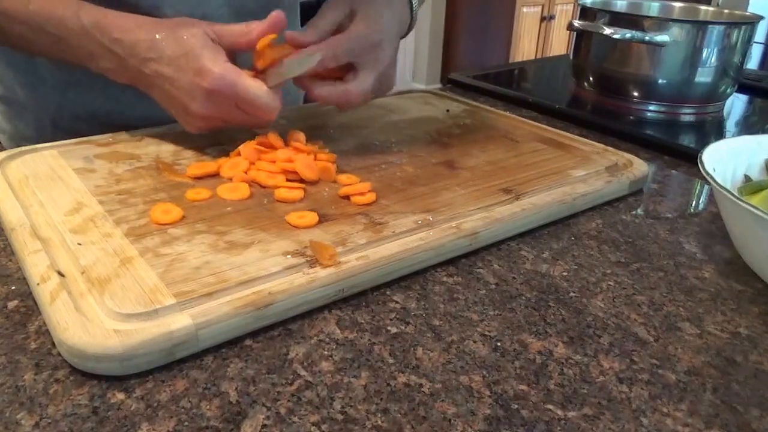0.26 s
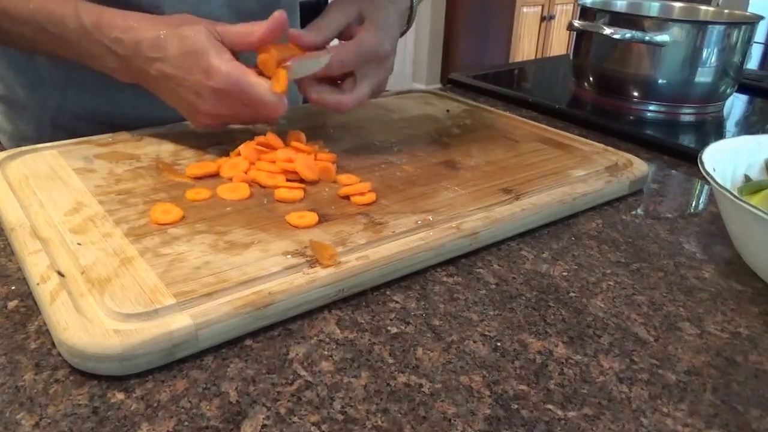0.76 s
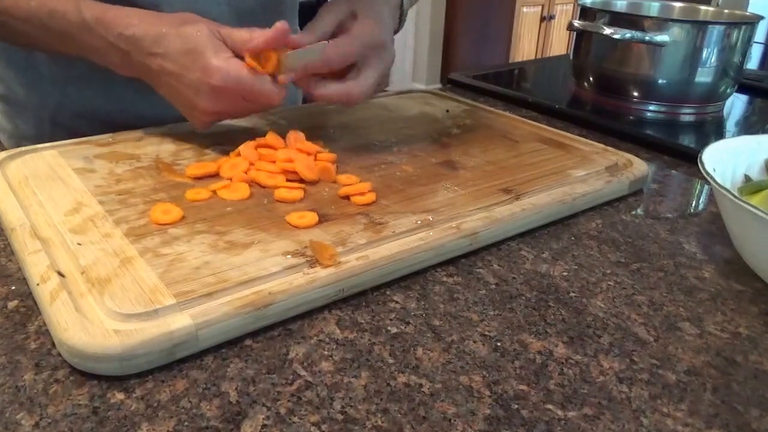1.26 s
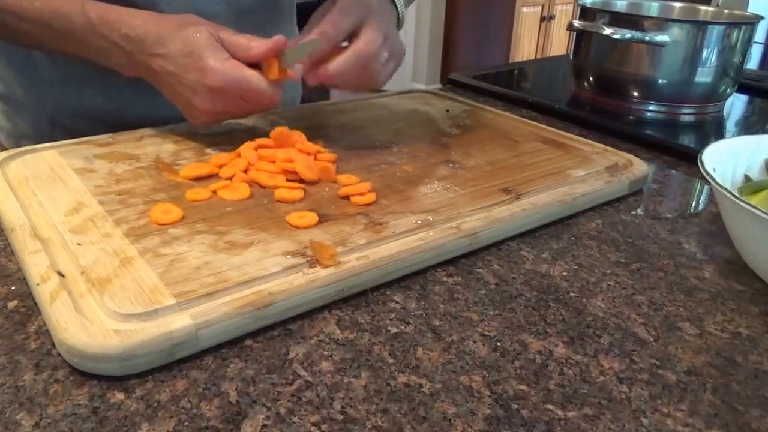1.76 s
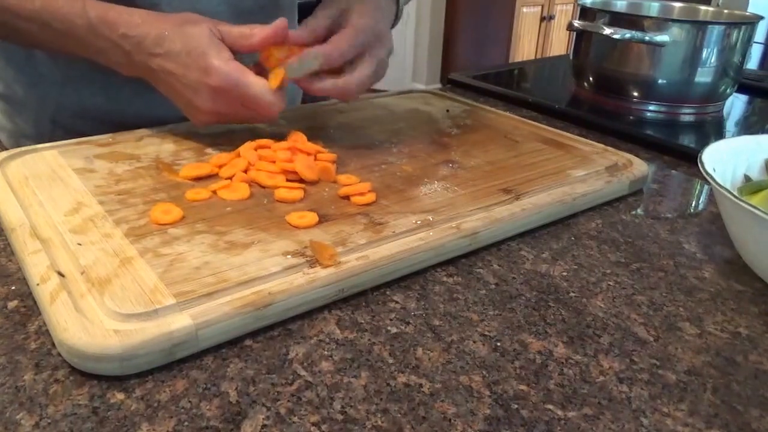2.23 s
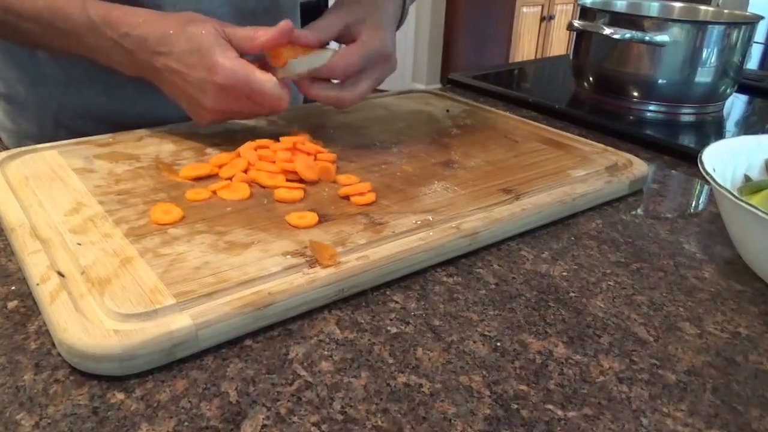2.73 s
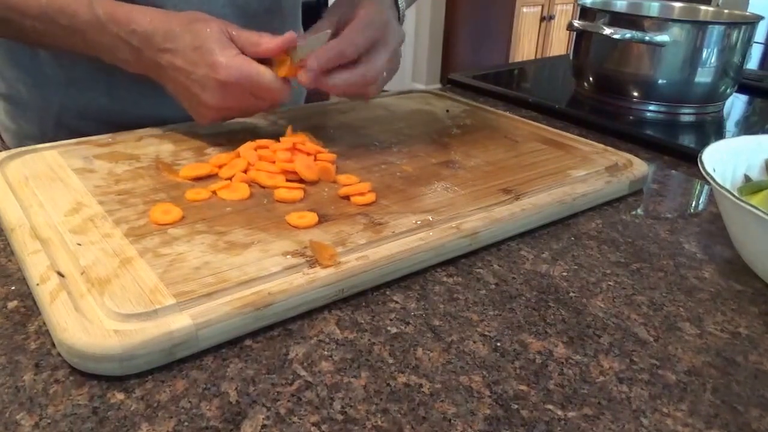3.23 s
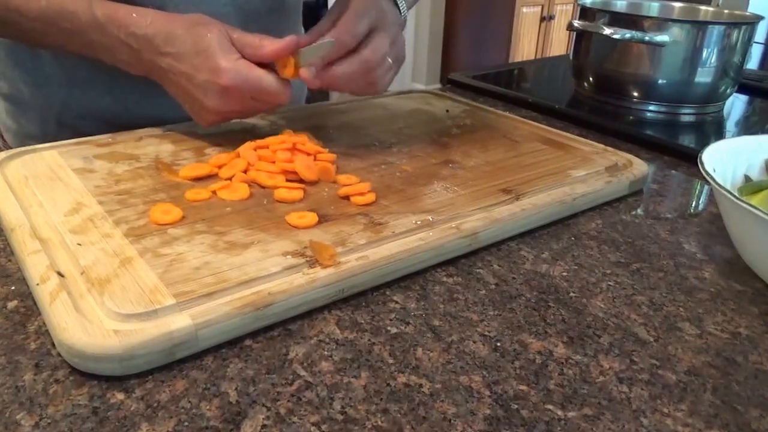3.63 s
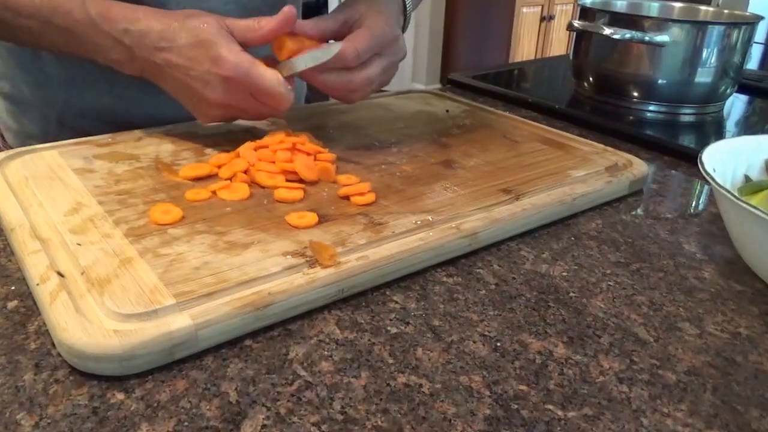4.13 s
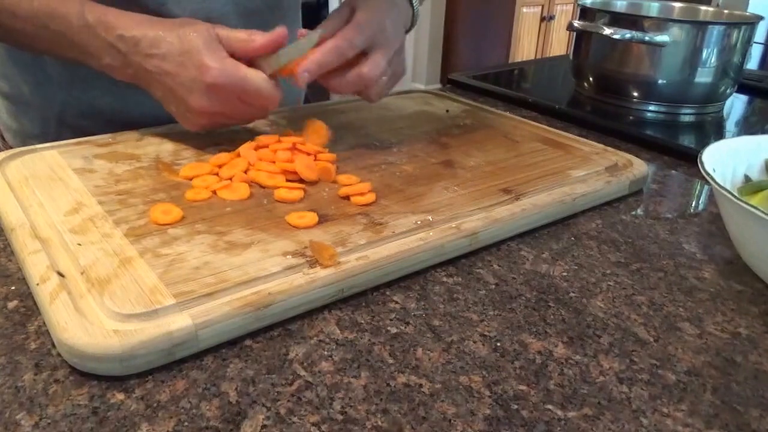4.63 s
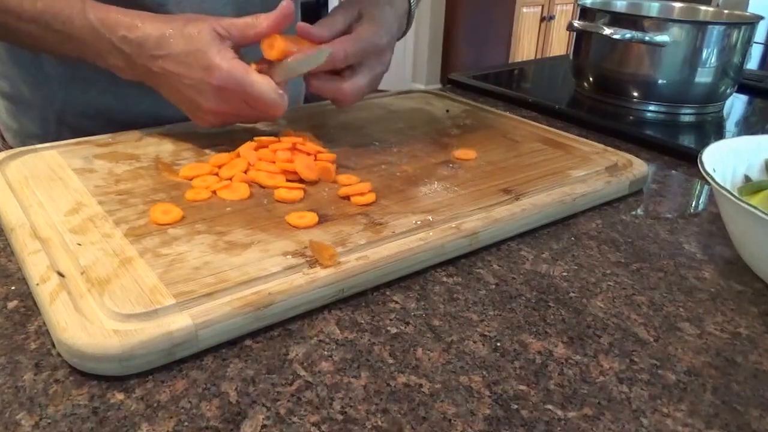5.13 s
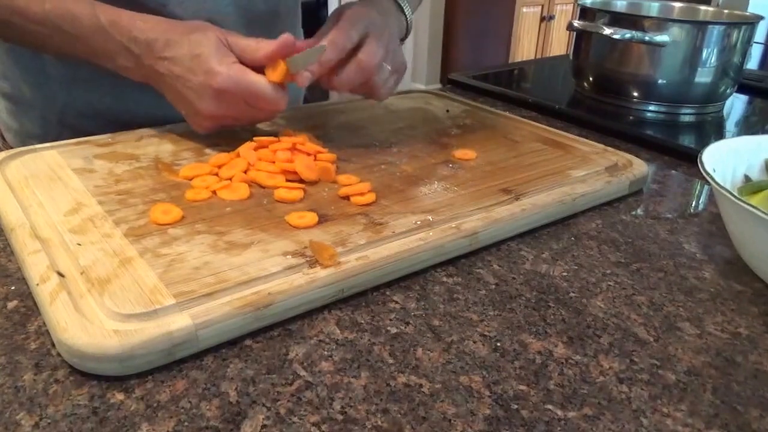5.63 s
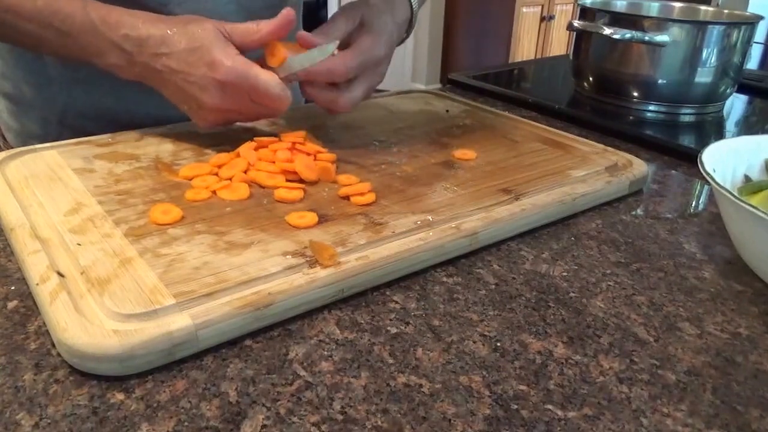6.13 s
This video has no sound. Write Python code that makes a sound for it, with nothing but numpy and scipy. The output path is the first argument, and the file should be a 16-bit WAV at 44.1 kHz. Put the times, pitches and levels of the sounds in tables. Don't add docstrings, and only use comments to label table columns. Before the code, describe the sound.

A close microphone in a home kitchen catches a small knife slicing a hand-held raw carrot, slightly left of centre. A stroke is already under way at the start, stuttering briefly, then crisp cuts follow roughly every 0.4 seconds until 3.6. Each begins softly, swells into fine bright crackle and stops on a sharp snap, strongest near 0.5 and 0.9. Between them are tiny ticks, faint rubs and light knocks of slices on the pile and board, notably around 1.4 and 2.3; from 2 to 3.5 the squeezed carrot gives faint groans. A slower sticking cut at 4.35 ends in a loud double crack at 4.5, with a dull knock at 4.7. Softer, hesitant cuts come at 5.4-5.7 and 6.1-6.2. Throughout, a quiet low appliance hum and broad airy noise continue, with hollow swishes near 0.9, 3.2, 4.3 and 5.5, and a very faint one at 2. The room adds a short, light tail.

```python
import sys
import numpy as np
from scipy import signal
from scipy.fft import rfft, irfft, next_fast_len
from scipy.io import wavfile
from scipy.ndimage import uniform_filter1d, map_coordinates

SR = 44100
rng = np.random.default_rng(int(sys.argv[2]) if len(sys.argv) > 2 else 0)


def decibels_to_gain(level_db):
    exponent = np.asarray(level_db, float) / 20
    return 10 ** exponent


def digitize_waveform(pressure):
    field = np.atleast_2d(pressure).T
    bounded = np.clip(field, -1, 1)
    quanta = np.round(bounded * 32767).astype(np.int16)
    wavfile.write(sys.argv[1], SR, quanta)


N = 281799

# frequency in Hz, level in dB.
AIR_TONE = [(36, -20), (62, -2), (75, -16.5), (145, -3.5), (165, -10), (192, -2.5), (362, -4), (536, -5.5),
            (572, -7), (711, -7.5), (1100, -11.5), (1200, -9.5), (2800, -19.5), (6560, -24), (11300, -25.5),
            (14700, -58), (22000, -120)]
AIR_DB = -53
# frequency in Hz, likeness from 0 to 1.
EAR_LIKENESS = [(60, 0.97), (140, 0.94), (350, 0.92), (840, 0.6), (2030, 0.3), (4880, 0.63), (11800, 0.83)]
# frequency in Hz, level in dB, unsteadiness in Hz.
MOTOR_TONES = [(48.6, -62.5, 0.23), (101.1, -72.5, 3.5), (203.3, -65.5, 5.68), (399, -70, 4.27),
               (533, -66, 1.92)]
# start in seconds, hold in seconds, level in dB.
SWISHES = [
    (0.927, 0.16, -54),
    (2.0, 0.11, -65),
    (3.167, 0.091, -51),
    (4.33, 0.1, -49.5),
    (5.5, 0.083, -49),
]
SWISH_RISE_S, SWISH_FALL_S, SWISH_FADE_DB = 0.075, 0.22, 15

# blade enters, is deep and is through in seconds, crackle in dB, flesh in dB.
STROKES = [(-.06, 0, 0.059, -38, -44.5), (0.396, 0.48, .51, -35.5, -47.5), (0.803, 0.888, 0.94, -38, -50),
           (1.201, 1.284, 1.32, -35, -49), (1.585, 1.647, 1.71, -36, -51), (1.972, 1.981, 2.065, -39, -50),
           (2.332, 2.39, 2.419, -34.5, -47), (2.715, 2.744, 2.816, -39, -50),
           (3.079, 3.12, 3.156, -36.5, -48), (3.458, 3.498, 3.567, -38.5, -49),
           (4.353, 4.413, 4.5, -37.5, -50.5), (5.39, 5.523, 5.576, -44, -52),
           (5.637, 5.697, 5.665, -44, -55), (6.12, 6.184, 6.23, -42, -49)]
TOUCH_S, TOUCH_DB = 0.013, 23
ENTRY_DB, FLESH_ENTRY_DB = -7, -10.5
CLIMB_DB = -0.5
FLESH_RISE = 0.5
LET_GO_S, LET_GO_DB = 0.0036, 16.5
TRAIL_S, TRAIL_DB = 0.035, 41
# first and last slip in seconds, period in seconds, gaps in dB.
STICK_SLIPS = [
    (.005, .075, .019, 15),
    (4.352, 4.434, .0164, 5),
    (5.395, 5.485, .018, 7),
]
# centre in seconds, half length in seconds, crackle in dB,
# flesh in dB relative to the crackle.
SHORT_RUBS = [
    (1.06, .035, -60, -8),
    (1.48, .015, -62, -5),
    (2.23, .03, -65, -5),
    (3.304, .04, -63.5, -8),
    (3.746, 0.009, -44.5, -11),
    (4.183, 0.0043, -45.5, -3),
    (4.207, 0.0043, -47.5, -4),
    (4.502, 0.0064, -22.5, -25.5),
    (4.887, 0.037, -58, -6),
    (6.333, 0.024, -66, -5),
]
# time in seconds, peak in dB, burst length in seconds.
FIBRE_SNAPS = [(0.0235, -26, 0.0023), (.0625, -27, .002), (0.48, -23.5, 0.0014), (0.5031, -26, 0.0027),
               (0.5067, -13, 0.0023), (0.8775, -24, .0025), (0.9244, -10.5, 0.0019), (1.312, -15, 0.0017),
               (1.6958, -20.5, 0.0029), (2.049, -26, .0028), (2.415, -21, 0.0033), (3.161, -27, 0.0034),
               (3.5335, -22, 0.0013), (3.572, -36, .0014), (3.581, -31.5, 0.00053), (3.752, -29.5, 0.0023),
               (4.472, -39, 0.0019), (4.487, -23, 0.0016), (4.5038, -11.5, 0.0013), (4.5093, -9, 0.0028),
               (5.535, -24, .0009), (5.5586, -30, 0.0014), (5.677, -33, .0008), (5.699, -27, .0008),
               (5.7055, -24, 0.0041), (5.7088, -21, 0.0019), (6.176, -26.5, 0.0036), (6.2077, -30, 0.002),
               (6.2108, -22.5, 0.003), (6.2137, -23, 0.0021)]
SNAP_FLESH_DB, SNAP_FLESH_GROWS = -41.5, 0.48
# time in seconds, peak in dB,
# flesh in dB relative to the peak, burst length in seconds.
LONE_TICKS = [(.1062, -41, -4, .0006), (.1973, -39, -4.5, 0.00077), (.3672, -52, -8, .0018),
              (.3862, -40, -2, .0014), (.7076, -48, -10, .001), (1.1736, -51, -12, .001),
              (1.1856, -36.5, -7, 0.00078), (1.397, -40, -14, .0006), (1.4933, -43, -8, .0009),
              (1.5799, -49, -4, 0.0012), (1.5896, -43, -9, .0012), (1.777, -44.5, -16, 0.0019),
              (1.8721, -43.5, -6, 0.00076), (1.9635, -29, -26, 0.0015), (2.1135, -31.5, 2.5, 0.0006),
              (2.2429, -45, -3, 0.0011), (2.4946, -41, -16, .0006), (2.5222, -40.5, 1, 0.00066),
              (3.4352, -44, -8, .0008), (3.6259, -38, -19, .0007), (3.6943, -43, -16, 0.00082),
              (3.6991, -48, -19, .0006), (3.7235, -37, -18, 0.002), (3.9129, -48, -12, 0.00052),
              (4.3175, -38.5, -7, 0.0031), (4.3526, -33.5, -5, 0.0035), (5.0794, -36.5, -12, 0.00078),
              (5.8154, -41.5, -4, .0008), (6.0972, -33, -7.5, .0028), (6.1554, -25, -8, .0007)]
# frequency in Hz, level in dB.
CRACKLE_TONE = [(4290, -54), (7300, -20), (8260, -12.5), (8530, -8.5), (8990, -3), (10500, 0.5), (11200, 1),
                (14600, -43), (22000, -120)]
# frequency in Hz, level in dB.
FLESH_TONE = [(1290, -23.5), (2200, -15), (2660, -11.5), (2900, -12), (3620, -5.5), (3910, -7.5),
              (4520, -5), (5750, -3), (6500, -7), (8450, -4.5), (14300, -120)]
# at entry in dB, when through in dB.
FLESH_LEAN = (-0.5, 2.5)
# frequency in Hz, level in dB.
PUFF_TONE = [(600, -26), (1200, 1.5), (2200, -3.5), (3500, -17), (6000, -29)]
PUFF_DB, PUFF_S = -37.5, 0.0014

# time in seconds, peak in dB, knock in Hz, time to fade by 60 dB in seconds,
# tick in dB relative to the knock.
LANDINGS = [(0.105, -52.5, 533, 0.064, 5), (1.409, -42.5, 1026, 0.028, 0), (1.41, -46, 1920, 0.015, -6),
            (2.1132, -50.5, 2070, 0.017, 13.5), (2.267, -42, 1590, 0.049, 3),
            (2.52, -52.5, 1260, 0.033, 10), (4.072, -45.5, 1266, 0.024, 0), (4.719, -42.5, 610, 0.033, -14),
            (4.966, -56, 540, 0.03, 1), (5.08, -43.5, 1390, 0.048, -15), (6.094, -50.5, 1350, 0.04, -7)]
# centre in seconds, level in dB, pitch in Hz.
SQUEEZES = [(2.035, -54, 686), (2.4, -54.5, 703), (2.775, -53, 612), (3.13, -51.5, 677), (3.12, -58, 1480),
            (3.52, -56, 710), (3.52, -59, 1393), (6.19, -58, 683), (6.205, -58, 2460), (6.205, -61, 1990),
            (2.29, -56, 1572), (2.295, -61, 3100), (2.77, -56.5, 1494)]
# delay in seconds, level in dB.
NEAR_BOUNCES = [(.0009, -24.5), (.0021, -26), (.0037, -40), (.006, -20.5)]
# frequency in Hz, time to fade by 60 dB in seconds.
ROOM_FADE = [(300, 0.48), (2000, 0.88), (6000, 0.31), (8500, .4), (10500, 0.31)]


def unit(x):
    return x / np.sqrt(np.mean(x ** 2) + 1e-20)


def along(points, hz):
    f, v = np.transpose(points)
    return np.interp(np.log(hz + 1), np.log(f + 1), v)


def wobble(rate):
    knots = rng.standard_normal(int(N * rate / SR) + 4)
    return map_coordinates(knots, [np.arange(N) * rate / SR])


def filtered(x, response):
    m = next_fast_len(N + 8192)
    return irfft(rfft(x, m) * response(np.fft.rfftfreq(m, 1 / SR)), m)[..., :N]


def causal(spectrum, size=1024):
    gain = decibels_to_gain(along(spectrum, np.fft.rfftfreq(size, 1 / SR)))
    cepstrum = irfft(np.log(gain + 1e-4), size)
    cepstrum = cepstrum * np.r_[1, 2 * np.ones(size // 2 - 1), 1, np.zeros(size // 2 - 1)]
    pulse = irfft(np.exp(rfft(cepstrum)), size)
    return pulse / np.linalg.norm(pulse)


def swell(times, levels_db):
    times = np.maximum.accumulate(times)
    return decibels_to_gain(np.interp(np.arange(N) / SR, times, levels_db, left=-120, right=-120))


def stereo_noise(spectrum, patchy_db):
    z = signal.stft(rng.standard_normal((2, N)), nperseg=512)[2]
    field = uniform_filter1d(rng.standard_normal(z.shape[1:]), 6, 0)
    field = uniform_filter1d(field, 14, 1)
    pair = signal.istft(z * decibels_to_gain(patchy_db * unit(field)), nperseg=512)[1][:, :N]

    def shares(hz):
        turn = np.arccos(np.clip(along(EAR_LIKENESS, hz), -1, 1)) / 2
        return decibels_to_gain(along(spectrum, hz)) * [np.cos(turn), np.sin(turn)]

    mid, side = filtered(pair, shares)
    return unit(np.array([mid + side, mid - side]))


def appliance():
    tones = np.zeros(N)
    for hz, db, drift in MOTOR_TONES:
        phase = 2 * np.pi * np.cumsum(hz + drift * wobble(15)) / SR
        tones += decibels_to_gain(db + 2 + drift / 3 * wobble(7.5)) * np.sin(phase)
    effort = np.zeros(N)
    for s, hold, db in SWISHES:
        effort += swell([s - SWISH_RISE_S, s, s + hold, s + hold + SWISH_FALL_S],
                        [db - SWISH_FADE_DB, db, db, db - SWISH_FADE_DB])
    hollow = [(1300, -31.5), (1680, -8), (1790, 2.5), (1900, -9), (2400, -29)]  # (Hz, dB)
    whoosh = unit(filtered(rng.standard_normal(N), lambda hz: decibels_to_gain(along(hollow, hz))))
    swish = decibels_to_gain(-8) * effort * decibels_to_gain(1.2 * wobble(40)) * whoosh
    air = decibels_to_gain(AIR_DB + 0.086 * wobble(2.36)) * stereo_noise(AIR_TONE, patchy_db=0.7)
    return air + tones + swish


def pressure():
    t = np.arange(N) / SR
    crackle, flesh = np.zeros(N), np.zeros(N)
    for enter, deep, through, db, flesh_db in STROKES:
        full = enter + FLESH_RISE * (deep - enter)
        touch, let_go, gone = enter - TOUCH_S, through + LET_GO_S, through + TRAIL_S
        crackle += swell([touch, enter, deep, through, let_go, gone],
                         [flesh_db - TOUCH_DB, flesh_db + ENTRY_DB, db,
                          db + CLIMB_DB, db - LET_GO_DB, db - TRAIL_DB])
        flesh += swell([touch, enter, full, through, let_go, gone],
                       [flesh_db - TOUCH_DB, flesh_db + FLESH_ENTRY_DB, flesh_db,
                        flesh_db, flesh_db - 0.62 * LET_GO_DB, flesh_db - 0.7 * TRAIL_DB])
    for s, half, db, flesh_db in SHORT_RUBS:
        rub = decibels_to_gain(db) * np.exp(-((t - s) / half) ** 2)
        crackle += rub
        flesh += decibels_to_gain(flesh_db) * rub
    stuck_db = np.zeros(N)
    for first, last, period, gap_db in STICK_SLIPS:
        during = (t > first) & (t < last)
        stuck_db += gap_db * during * np.sin(np.pi * (t - first) / period) ** 2
    return crackle * decibels_to_gain(-stuck_db), flesh * decibels_to_gain(-stuck_db)


def cells(share, spread_db, clump_db):
    burst = rng.random(N) < share
    size = decibels_to_gain(spread_db * rng.exponential(size=N) + clump_db * wobble(160))
    return unit(burst * size * rng.choice([-1, 1], N))


def patchy(x, depth_db):
    z = signal.stft(x, nperseg=256)[2]
    field = uniform_filter1d(rng.standard_normal(z.shape), size=2, axis=0)
    field = uniform_filter1d(field, size=9, axis=1)
    return signal.istft(z * decibels_to_gain(depth_db * unit(field)), nperseg=256)[1][:N]


def knife():
    lead = 200
    bright, dull = np.zeros(N + SR), np.zeros(N + SR)
    fine = cells(share=0.16, spread_db=1.73, clump_db=2.5)
    coarse = cells(share=0.25, spread_db=-3.5, clump_db=2.0)
    crackle, flesh = pressure()
    bright[lead:N + lead] = crackle * unit(patchy(fine, depth_db=2.0))
    dull[lead:N + lead] = decibels_to_gain(1.5) * flesh * unit(patchy(coarse, depth_db=2.5))
    snaps = list(LONE_TICKS)
    for s, db, length in FIBRE_SNAPS:
        snaps.append((s, db, SNAP_FLESH_DB + SNAP_FLESH_GROWS * (db + 26) - db, length))
    u = np.arange(-lead, 2 * lead) / SR
    luck = rng.standard_normal((len(snaps), 2, len(u)))
    for (s, db, flesh_db, length), (a, b) in zip(snaps, luck):
        fade = np.exp(-(u / max(length, 0.0002)) ** 2)
        tearing = 0.17 * fade * a * np.abs(a) ** 0.5
        tearing[lead - 8] = min(0.00065 / length, 1)
        start = round(s * SR)
        bright[start:][:len(u)] += decibels_to_gain(db + 6.0) * tearing
        dull[start:][:len(u)] += decibels_to_gain(db + flesh_db + 7.5) * (tearing + 0.11 * fade * b)
    bright = signal.oaconvolve(bright[lead:], causal(CRACKLE_TONE))[:N]
    dull = signal.oaconvolve(dull[lead:], causal(FLESH_TONE))[:N]
    return bright, dull


def leaning(flesh):
    t = np.arange(N) / SR
    low = filtered(flesh, lambda hz: 1 / (1 + (hz / 3900) ** 6))
    spans = np.array(STROKES)[:, [0, 2]]
    moments = np.maximum.accumulate(spans.ravel())
    lean_db = np.interp(t, moments, np.tile(FLESH_LEAN, len(spans)))
    tone = decibels_to_gain(lean_db) * low + decibels_to_gain(-lean_db) * (flesh - low)
    entry = 0.001088 + 0.000396 * rng.random(len(spans))
    depth = entry[:, None] * (1 + 0.82 * (spans - spans[:, :1]))
    trip = np.interp(t, moments, depth.ravel())
    return tone + sum(0.24 ** k * np.interp(t - k * trip, t, tone) for k in range(1, 3))


def parting():
    out, u = np.zeros(N + SR), np.arange(400) / SR
    luck = rng.standard_normal((len(FIBRE_SNAPS), len(u)))
    for (s, db, length), puff in zip(FIBRE_SNAPS, luck):
        level = decibels_to_gain(PUFF_DB + 0.68 * (db + 4.5))
        out[round(s * SR):][:len(u)] += level * unit(puff) * np.exp(-u / PUFF_S)
    return signal.oaconvolve(out, causal(PUFF_TONE))[:N]


def slices():
    out, t = np.zeros(N + SR), np.arange(SR // 6) / SR
    luck = rng.standard_normal((len(LANDINGS), 2, len(t)))
    for (s, db, hz, t60, tick_db), (shake, burst) in zip(LANDINGS, luck):
        rattle = decibels_to_gain(2 * unit(uniform_filter1d(shake, size=120)))
        overtone = 0.7 * np.sin(2 * np.pi * 1.9 * hz * t) * decibels_to_gain(-60 * t / 0.02)
        knock = decibels_to_gain(-60 * t / t60) * rattle * (np.sin(2 * np.pi * hz * t) + overtone)
        tick = decibels_to_gain(tick_db - 60 * t / 0.015) * unit(uniform_filter1d(burst, size=7))
        onset = 1 - np.exp(-t / 0.001)
        out[round(s * SR):][:len(t)] += decibels_to_gain(db + 2.5) * onset * (knock + tick)
    return out[:N]


def thumb():
    out = np.zeros(N)
    half = SR // 10
    u = np.arange(-half, half) / SR
    luck = rng.standard_normal((len(SQUEEZES), 2, len(u)))
    for (s, db, hz), pair in zip(SQUEEZES, luck):
        smooth = 350 if 1500 < hz < 1600 else 110
        a, b = unit(uniform_filter1d(pair, size=smooth, axis=1))
        groan = a * np.sin(2 * np.pi * hz * u) + b * np.cos(2 * np.pi * hz * u)
        out[round(s * SR) - half:][:len(u)] += decibels_to_gain(db) * np.exp(-(u / 0.035) ** 2) * groan
    return out


def bounced(x):
    x = x + sum(decibels_to_gain(db) * np.pad(x, (round(s * SR), 0))[:N] for s, db in NEAR_BOUNCES)
    return filtered(x, lambda hz: 1 - 0.56 * np.exp(-((hz - 6900) / 350) ** 2))


def kitchen(x):
    hz, t, z = signal.stft(rng.standard_normal((2, SR // 2)), SR, nperseg=256)
    fade = decibels_to_gain(-60 * t / along(ROOM_FADE, hz)[:, None])
    tail = signal.istft(z * fade, SR, nperseg=256)[1]
    tail = tail / np.linalg.norm(tail[0])
    return signal.fftconvolve(np.pad(x, (200, 0))[None], tail, axes=1)[:, :N]


def scene():
    bright, dull = knife()
    bright = bounced(bright)
    dull = bounced(leaning(dull) + slices() + thumb() + parting())
    scatter = rng.standard_normal(500) * np.exp(-np.arange(500) / 120)
    side = decibels_to_gain(-11) * signal.fftconvolve(dull, scatter / np.linalg.norm(scatter))[:N]
    near = (bright + dull) * decibels_to_gain([[0.3], [-0.3]]) + side * [[1], [-1]]
    return near + kitchen(decibels_to_gain(-17.5) * bright + decibels_to_gain(-10.0) * dull) + appliance()


def roll_off(x):
    return signal.sosfilt(signal.butter(12, 12370, fs=SR, output="sos"), x)


def record(dry):
    edge = [(11000, 0.5), (11080, -28), (11350, -35.5), (12300, -84)]  # (Hz, dB)
    stop = [(12300, 0), (13200, -70)]  # (Hz, dB)
    mix = filtered(dry, lambda hz: decibels_to_gain(along(edge, hz) + along(stop, hz)))
    return roll_off(mix)


dry = scene()
out = record(dry)
digitize_waveform(out)
```